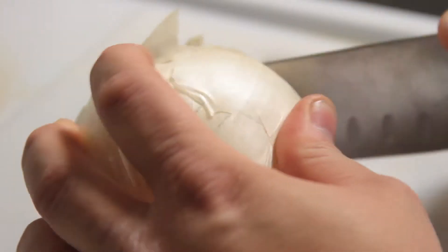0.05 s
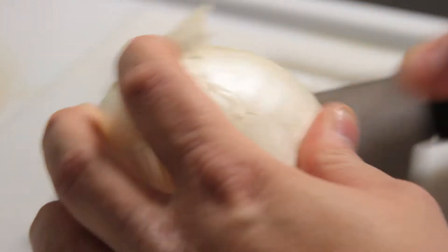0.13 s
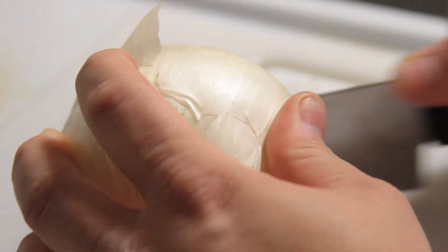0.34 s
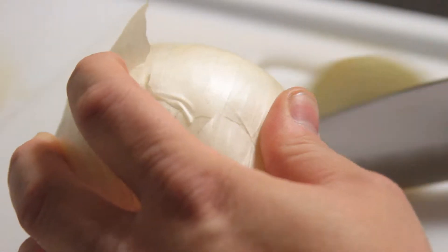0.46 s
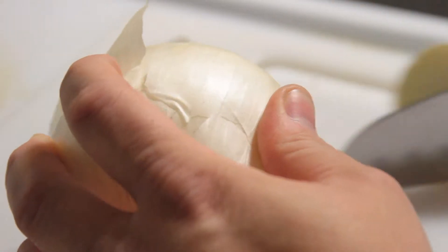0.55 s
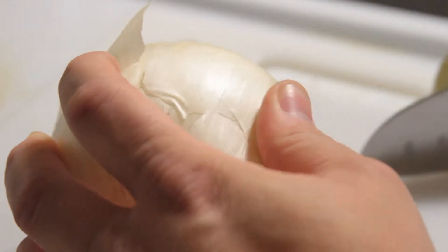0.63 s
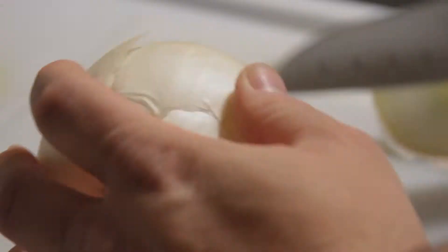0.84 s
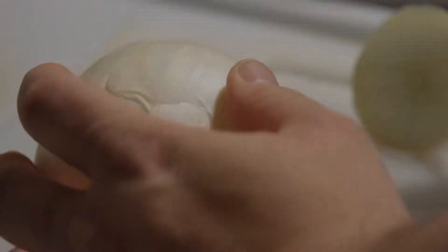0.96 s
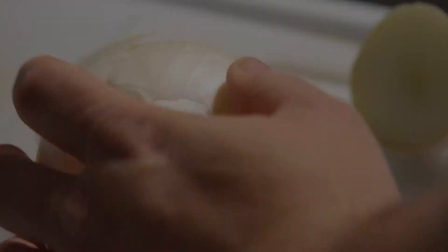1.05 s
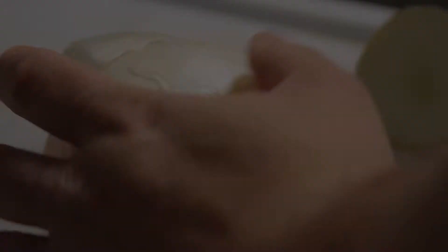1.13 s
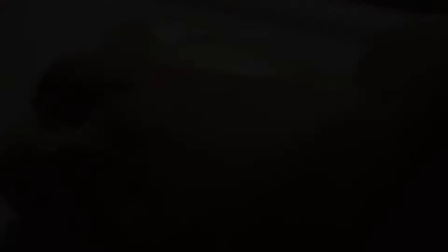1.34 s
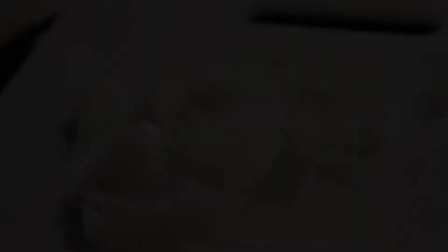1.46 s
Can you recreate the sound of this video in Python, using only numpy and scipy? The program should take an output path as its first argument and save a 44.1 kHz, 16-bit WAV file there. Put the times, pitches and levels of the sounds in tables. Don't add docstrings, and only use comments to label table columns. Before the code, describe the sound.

An onion being cut, very close: dry skin crackles under a sawing knife, a slice ends in one sharp knock on a plastic board, then papery snaps and light finger rustles in a quiet kitchen.

```python
import sys
import numpy as np
from scipy import signal
from scipy.fft import rfft, irfft, next_fast_len
from scipy.io import wavfile
from scipy.ndimage import uniform_filter1d, map_coordinates

SR = 44100
rng = np.random.default_rng(int(sys.argv[2]) if len(sys.argv) > 2 else 0)


def log_audio(samples):
    frames = np.atleast_2d(samples).T
    limited = np.clip(frames, -1, 1)
    pcm = np.round(limited * 32767).astype(np.int16)
    wavfile.write(sys.argv[1], SR, pcm)


def voltage_ratio(level):
    return 10 ** (np.asarray(level, float) / 20)


N = 66150


def unit(x):
    return x / np.sqrt(np.mean(x ** 2) + 1e-20)


def along(points, hz):
    f, v = np.transpose(points)
    return np.interp(np.log(hz + 1), np.log(f + 1), v)


def two_gains(rows):
    s, db, extra_db = np.transpose(rows)
    t = np.arange(N) / SR
    return voltage_ratio(np.interp(t, s, db, right=-120)), voltage_ratio(np.interp(t, s, extra_db))


def wobble(rate_hz):
    values = rng.standard_normal(int(N * rate_hz / SR) + 4)
    return map_coordinates(values, [np.arange(N) * rate_hz / SR])


def filtered(x, response):
    m = next_fast_len(N + SR // 2)
    return irfft(rfft(x, m) * response(np.fft.rfftfreq(m, 1 / SR)), m)[..., :N]


def highpass(x, hz, order):
    return signal.sosfilt(signal.butter(order, hz, 'high', fs=SR, output='sos'), x)


def grains(start_s, hz, decay_cycles, size, rise_cycles=.05, count=256):
    t = np.arange(count) / SR
    hz = np.clip(hz, 300, 16000)[:, None]
    decay = np.exp(-t * hz / decay_cycles[:, None])
    rise = (1 - np.exp(-t * hz / rise_cycles)) ** 2
    wave = size[:, None] * np.sin(2 * np.pi * hz * t) * decay * rise
    at = np.round(start_s * SR).astype(int)[:, None] + np.arange(count)
    return np.bincount(at.ravel(), wave.ravel(), N + SR)[:N]


def floor():
    # f/Hz, density/dB
    hiss_spectrum = [(71, -33.5), (120, -13.5), (257, -6), (812, -16), (2050, -15.5), (2270, -16),
                     (2850, -15.5), (15700, -15.5), (16100, -40.5)]
    # f/Hz, density/dB
    rumble_spectrum = [(12, -34), (20, 3.5), (38, 0), (124, -26.5), (150, -28), (200, -56), (330, -120)]
    hiss_db, rumble_db = -65, -67.5

    def noise_pair(side):
        return np.array([[1, side], [1, -side]]) @ rng.standard_normal((2, N))

    hiss = unit(filtered(noise_pair(0.28), lambda hz: voltage_ratio(along(hiss_spectrum, hz))))
    rumble = filtered(noise_pair(0.62), lambda hz: voltage_ratio(along(rumble_spectrum, hz)))
    rumble = unit(rumble * voltage_ratio(2.0 * wobble(26)))
    return voltage_ratio(hiss_db) * hiss + voltage_ratio(rumble_db) * rumble


def patchy(x, depth_db):
    z = signal.stft(x, nperseg=256)[2]
    field = uniform_filter1d(rng.standard_normal(z.shape), 3, 0)
    field = uniform_filter1d(field, 7, 1)
    return signal.istft(z * voltage_ratio(depth_db * unit(field)), nperseg=256)[1][:N]


def rustle():
    # t/s, level/dB, extra brightness/dB
    strokes = [
        [(0, -47.5, 1.5), (.013, -46.5, 1), (.017, -41, -2), (.04, -44.5, 1), (.062, -37.5, 1),
         (.082, -40, -0.5), (.1, -42.5, -1), (.128, -49, 3.5), (.157, -55.5, 0)],
        [(.157, -56, 0), (.161, -42.5, -4), (.172, -32.5, 1.5), (.188, -35, 5), (.212, -29.5, 0),
         (.235, -36, 2), (.265, -39, 6.5), (.32, -48, -0.5), (.36, -66, 5)],
        [(.36, -68, 2), (.405, -51.5, 0), (.418, -34.5, 8), (.435, -45.5, 2.5), (.475, -48.5, 2),
         (.53, -49.5, 3), (.56, -54.5, 2.5), (.6, -53, 0.5), (.78, -72.5, 4)],
    ]
    # t/s, length/s, level/dB
    shifts = [
        (0.668, .06, -56),
        (0.805, 0.045, -51.5),
        (0.866, 0.056, -51.5),
        (.905, 0.027, -43),
        (0.949, 0.035, -53.5),
        (1.117, 0.05, -43.5),
        (1.177, 0.021, -38.5),
        (1.303, 0.035, -59.5),
        (1.363, 0.041, -53),
        (1.429, 0.017, -55),
    ]
    # f/Hz, density/dB
    skin_spectrum = [(880, -40.5), (1500, -14.5), (1940, -16.5), (3660, -9), (4200, -12), (6560, -3.5),
                     (13300, -10.5), (15900, -17), (16200, -40.5)]
    count = 7000
    size = voltage_ratio(3.0 * np.minimum(rng.exponential(size=count), 2.4)) * rng.choice([-1, 1], count)
    start_s = rng.uniform(0, N / SR, count)
    pitch_hz = 8000 * np.exp(.55 * rng.standard_normal(count))
    cracks = grains(start_s, pitch_hz, rng.uniform(2, 12, count), size)
    cracks = filtered(cracks, lambda hz: (hz + 500) / 8000)
    shear = 0.95 * rng.standard_normal(N)
    skin = filtered(unit(cracks) + shear, lambda hz: voltage_ratio(along(skin_spectrum, hz)))
    skin = unit(patchy(skin, depth_db=1.67))

    t = np.arange(N) / SR
    shift_gain = np.zeros(N)
    for s, length_s, db in shifts:
        onset = np.clip((t - s) / 0.0063, 0, 1)
        shift_gain += voltage_ratio(db) * onset * voltage_ratio(-14 * np.clip(t - s, 0, None) / length_s)
    gain, bright = two_gains(sum(strokes, []))
    stroke = gain * (skin + highpass(skin, 8500, order=3) * (bright - 1))
    shifting = highpass(skin, 2600, order=3) * shift_gain
    clumps = voltage_ratio(2.26 * wobble(110) + 0.73 * wobble(39))
    return (stroke + shifting) * clumps


def drag():
    # t/s, level/dB, high modes over low/dB
    drag_path = [(0, -52.5, 10), (.05, -57, 20), (.085, -48, 2), (.14, -75, 14), (.17, -47, 6),
                 (.22, -58.5, -0.5), (.28, -63, 16), (.37, -59.5, 3.5), (.41, -62.5, -2), (.44, -48, -10),
                 (.55, -59, 6.5), (.65, -59, -8), (.668, -72, -15), (.685, -52.5, -12.5), (.78, -72, -11.5),
                 (.87, -62, 9), (.93, -71, 10.5), (1.0, -93, -1)]
    # f/Hz, width/Hz, level/dB
    low_modes = [(384, 40, -8), (588, 30, -1), (724, 50, -4)]
    high_modes = [(990, 76, -1.5), (1191, 60, 2.5), (1421, 200, -3), (1830, 87, -14)]

    def rubbed(modes):
        def body(f):
            total = 0
            for k, (centre, width, db) in enumerate(modes):
                damping = 1j * f * width
                total = total + voltage_ratio(db) * damping / (centre ** 2 - f * f + damping) * (-1) ** k
            return total

        friction = rng.standard_normal(N) * voltage_ratio(1.5 * wobble(90))
        return unit(filtered(friction, body))

    low, high = rubbed(low_modes), rubbed(high_modes)
    gain, high_gain = two_gains(drag_path)
    mix = gain * (low + high_gain * high) / np.hypot(1, high_gain)
    return highpass(mix, 400, order=3)


def snaps():
    # t/s, level/dB, pitch f/Hz, length/ms, narrowing/(dB/octave^2)
    snap_events = [(0.014, -36, 9010, 3.4, 7), (0.025, -38.5, 6730, 3.3, 8), (0.0491, -41.5, 6800, 1.3, 8),
                   (0.0642, -37, 7030, 2, 8), (0.0742, -24.5, 7510, .6, 6.5), (0.0769, -25, 6654, .8, 10.5),
                   (0.158, -38.5, 3526, 1.3, 12), (.163, -33, 9480, 1.5, 14), (.1661, -27, 7550, 1, 11),
                   (0.1722, -25, 5966, 1.5, 14), (0.21, -26.5, 8020, 0.41, 4.5),
                   (.2612, -20, 6500, 1.5, 13.5), (0.3915, -38, 2900, 1.25, 40),
                   (.396, -34, 7110, .74, 29.5), (0.4029, -26, 8110, 1.5, 29),
                   (0.4155, -16, 12660, 2.12, 6), (0.4192, -26, 8830, 2.5, 6.5),
                   (0.4438, -32, 5800, 3.6, 19), (.575, -38, 10860, 2.5, 21), (0.5886, -25, 8920, 0.53, 11),
                   (.6005, -37, 7570, 0.71, 9), (0.6391, -41.5, 8500, 0.87, 2.5),
                   (0.6745, -38, 11720, 3.8, 12), (0.693, -41, 5050, 2.4, 29),
                   (0.7206, -48, 8530, 1.43, 16.5), (0.8155, -31, 11450, 0.58, 5),
                   (.8816, -31.5, 7510, 1.5, 15.5), (0.9076, -23, 7770, 1.2, 11),
                   (0.9172, -23, 9350, 1.2, 18), (0.9596, -47, 7540, 1.7, 18.5),
                   (0.9671, -30.5, 11290, 1.5, 12), (.9715, -39.5, 7150, 3, 23),
                   (1.1237, -22.5, 9130, 1.5, 17), (1.1263, -26, 10020, 2, 17),
                   (1.1277, -25.5, 8140, 2.5, 15.5), (1.1821, -17, 8000, 1.09, 14),
                   (1.185, -37, 3017, 4.56, 18), (1.3166, -46.5, 8550, 2, 14), (1.352, -35, 9070, 0.65, 10),
                   (1.4348, -42, 7250, 2, 9)]
    s, db, hz, ms, focus_db = np.array(snap_events).T[:, :, None]
    count = 40
    u = rng.uniform(size=(len(snap_events), 4, count)).transpose(1, 0, 2)
    lead = np.arange(count) % 3 == 0
    late = np.where(lead, .3 + .25 * u[0], 2.3 * u[0] ** 1.8)
    pitch_hz = 1500 * 10.4 ** ((np.arange(count) + u[1]) / count)
    order_db = 7 * lead - 9 * np.abs(late - .3)
    size = voltage_ratio(db - 7.5 + order_db - focus_db * np.log2(pitch_hz / hz) ** 2 - 10 * u[3])
    cycles = np.sqrt(ms) * 13 * (.3 + u[2]) * pitch_hz / 12000
    start_s = s + late * ms / 1000
    run = grains(start_s.ravel(), pitch_hz.ravel(), cycles.ravel(), size.ravel(), rise_cycles=.8)
    return highpass(run, 1300, order=4)


def ring(modes, narrow_db, longest_s):
    t = np.arange(SR // 4) / SR
    total = np.zeros(len(t))
    for hz, db, t60 in modes:
        level_db = db - narrow_db * np.log2(hz / 1280) ** 2 + rng.normal(0, 1.4)
        total -= voltage_ratio(level_db - 60 * t / min(t60, longest_s)) * np.sin(2 * np.pi * hz * t)
    return total


def knocks():
    # t/s, level/dB, narrowing around the middle modes/(dB/octave^2), contact/ms
    blows = [(0.2205, -9.5, 1.5, 0.17), (0.2239, -16.5, 13.5, 0.29), (0.2259, -18.5, 7, 0.27),
             (.2318, -23.5, 6, 0.71), (0.256, -28, 5, 5.6), (.2615, -30, -2.5, 5.2), (.416, -42, 12, 2.07),
             (0.7976, -36, 2, 1.86), (.803, -37, 4.5, 2.1), (.871, -57, 48, .2), (0.881, -50.5, 63, .2),
             (.899, -61, 49, .2), (0.9157, -45, 86, .2), (.96, -58, 29, .2), (1.167, -58.5, 60.5, 6.7),
             (1.371, -56, 10.5, 8.43)]
    # f/Hz, level/dB, t60/s
    board_modes = [(364, 4.5, 0.047), (528, -8, 0.1), (643, 0, 0.041), (784, 4.5, 0.039),
                   (886, -8, 0.04005), (1050, 3, 0.015), (1135, -4, 0.14), (1256, 4.5, 0.023),
                   (1374, -6, 0.031), (1618, -14.5, 0.013), (1883, -26.5, 0.081), (2427, -5, 0.035),
                   (2710, -5, 0.035), (3730, -32, 0.098)]
    # f/Hz, level/dB, t60/s
    blade_modes = [(4470, -17.5, .05), (4860, -25.5, 0.05), (5663, -18.5, 0.14), (6360, -22.5, .15),
                   (6400, -14.5, 0.02), (7380, -23, .03), (7918, -18.5, 0.62)]
    chop_s = blows[0][0]
    struck_t60_s, light_t60_s, blade_free_s = .06, 0.054, .043
    out, t = np.zeros(N + SR), np.arange(SR // 4) / SR
    crack_lowpass = signal.butter(4, 8000, fs=SR, output='sos')
    crack_decay = voltage_ratio(-4 - 60 * t / 0.0056) + voltage_ratio(-5 - 60 * t / 0.063) + voltage_ratio(-16.0 - 60 * t / 0.32)
    blade_free = np.clip(t / 0.028, 0, 1) * voltage_ratio(-2500 * np.clip(t - blade_free_s, 0, None))
    for s, db, narrow_db, ms in blows:
        crack = signal.sosfilt(crack_lowpass, rng.standard_normal(len(t))) * crack_decay
        tap_at = np.arange(5) / 4 * ms * SR / 1000 * rng.uniform(0.62, 1, 5)
        taps = np.bincount(tap_at.astype(int), rng.uniform(0.15, 0.23, 5))
        blade = voltage_ratio(-5) * (s == chop_s) * blade_free * ring(blade_modes, 0, longest_s=1)
        board = ring(board_modes, narrow_db, struck_t60_s if s < .3 else light_t60_s)
        blow = np.convolve(board, taps)[:len(t)] + voltage_ratio(-1.2 * narrow_db) * (blade + crack)
        out[round(s * SR):][:len(t)] += voltage_ratio(db) * blow

    since = np.clip(np.arange(N) / SR - chop_s, 0, None)
    push_s, thud_hz = 0.0029, 90
    push = voltage_ratio(-30.5) * since / push_s * np.exp(-since / push_s)
    thud = filtered(rng.standard_normal(N), lambda hz: voltage_ratio(-3.5 * np.log2((hz + 1) / thud_hz) ** 2))
    thud = unit(thud) * voltage_ratio(-51 - 60 * since / 0.89) * np.clip(since / 0.0043, 0, 1)
    return highpass(out[:N], 360, order=6) + push + thud


def room(x):
    # f/Hz, t60/s
    kitchen_decay = [(300, 0.34), (2000, 0.21), (10000, 0.077)]
    hz, t, z = signal.stft(rng.standard_normal((2, SR // 3)), SR, nperseg=256)
    decay = voltage_ratio(-60 * t / along(kitchen_decay, hz)[:, None])
    tail = signal.istft(z * decay, SR, nperseg=256)[1]
    tail = tail / np.linalg.norm(tail[0])
    delayed = np.pad(x, (200, 0))[None]
    return signal.fftconvolve(delayed, tail, axes=1)[:, :N]


def scene():
    skin = rustle() + snaps()
    board = knocks() + drag()
    late_echo_db = 1
    echo = room(board * np.where(np.arange(N) < .77 * SR, 1, voltage_ratio(late_echo_db)))
    board_echo = 1.0 * echo[0] + highpass(echo, 900, order=2) * 0.11
    scatter = rng.standard_normal(128) * voltage_ratio(-0.15 * np.arange(128))
    scattered = np.convolve(skin, scatter / np.linalg.norm(scatter))[:N]
    side = voltage_ratio(-14.5) * highpass(scattered, 5000, order=2)
    direct = skin + [side, -side] + board
    return direct + voltage_ratio(-18) * room(skin) + voltage_ratio(-16) * board_echo + floor()


def low_pass(x):
    return signal.sosfilt(signal.butter(12, 16510, fs=SR, output="sos"), x)


def record(dry):
    top, top_hz = 1.12, 16400
    clipped = dry / (1 + np.abs(dry / top) ** 6) ** (1 / 6)
    mix = filtered(clipped, lambda hz: hz < top_hz)
    return low_pass(mix)


dry = scene()
out = record(dry)
log_audio(out)
```